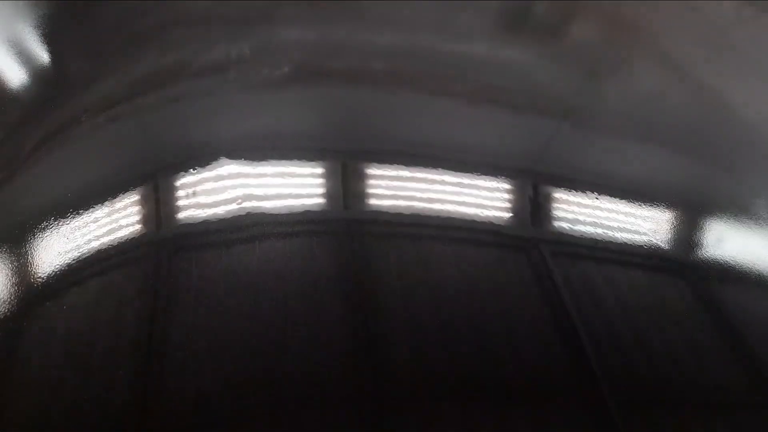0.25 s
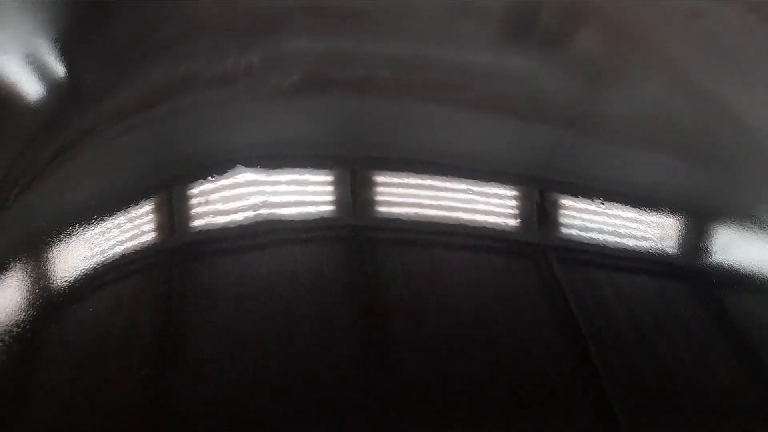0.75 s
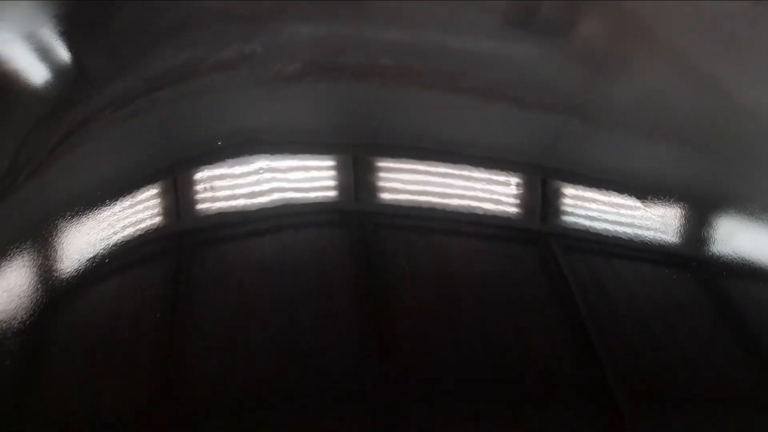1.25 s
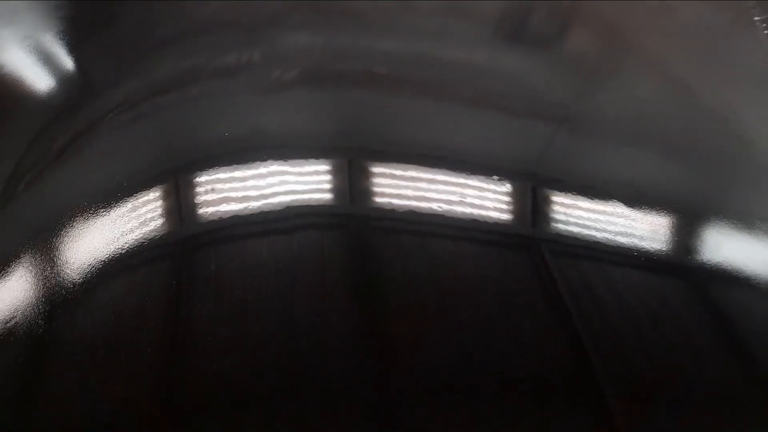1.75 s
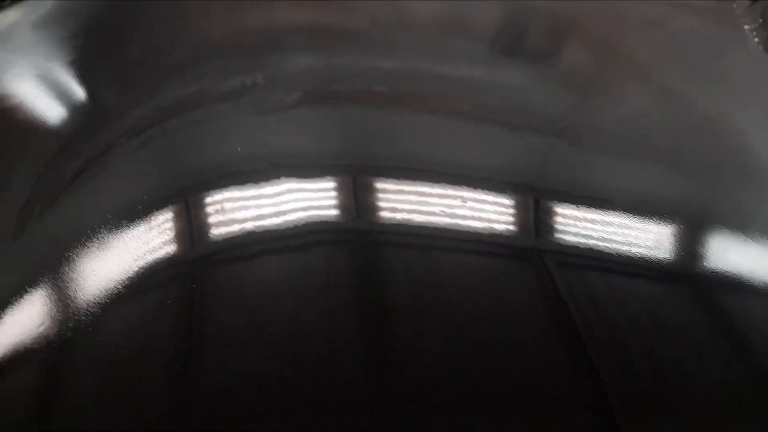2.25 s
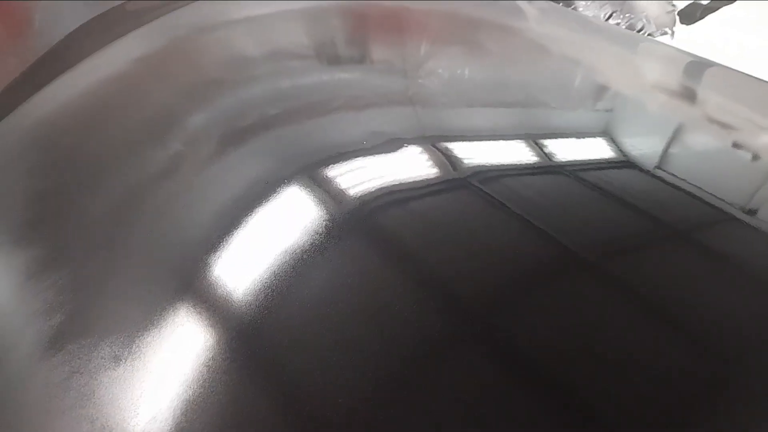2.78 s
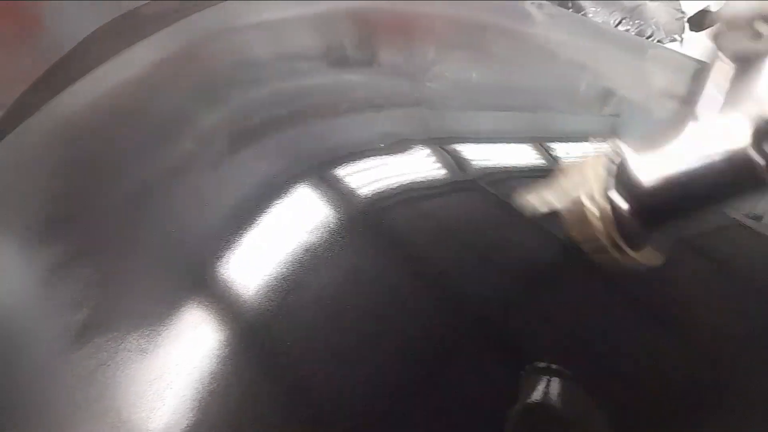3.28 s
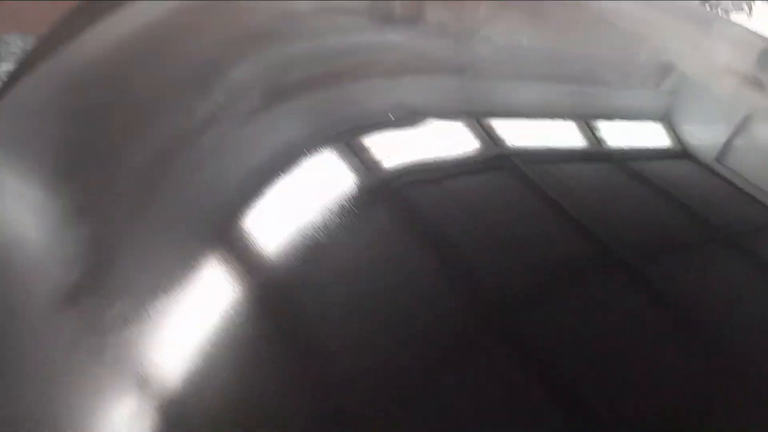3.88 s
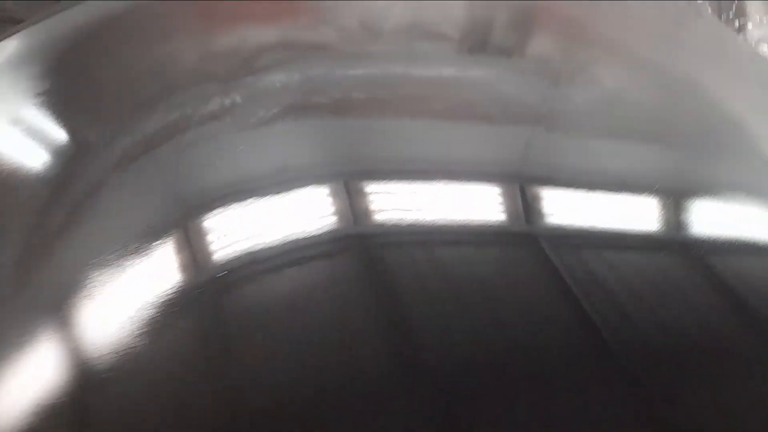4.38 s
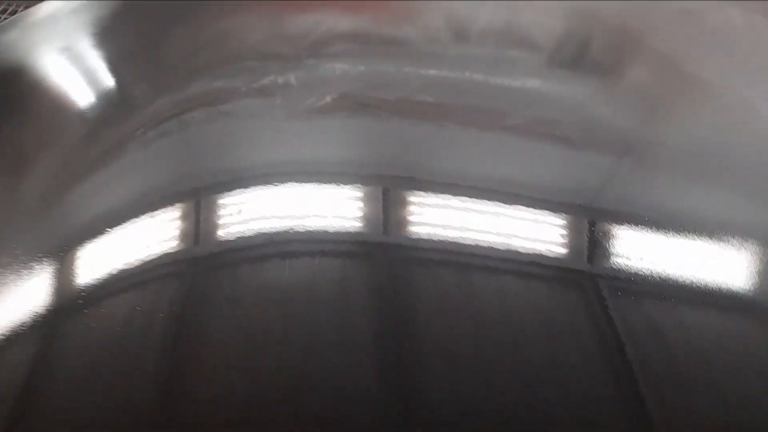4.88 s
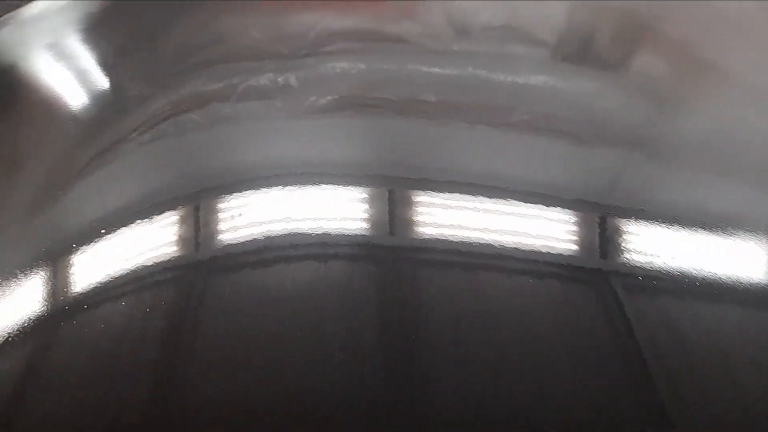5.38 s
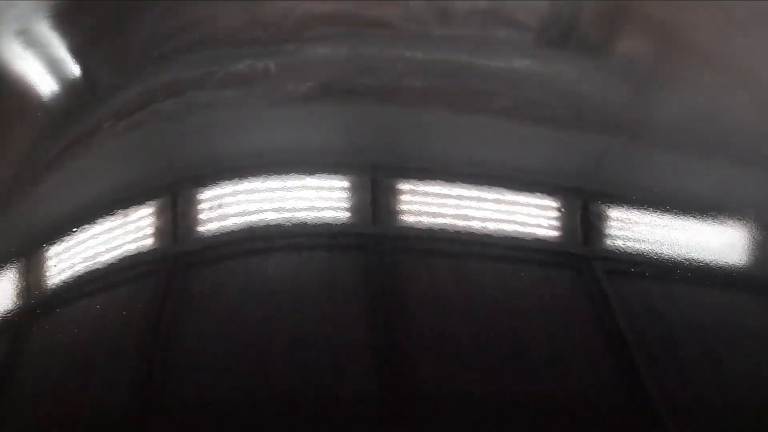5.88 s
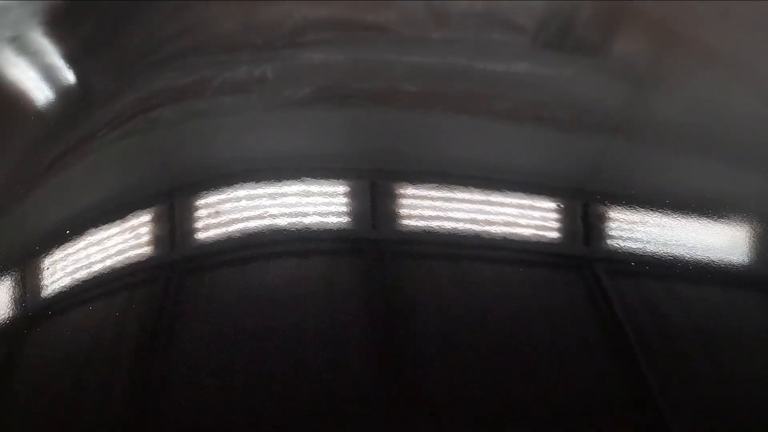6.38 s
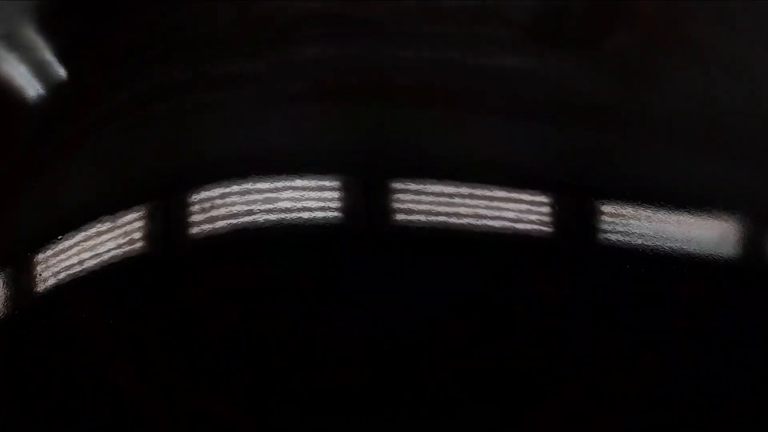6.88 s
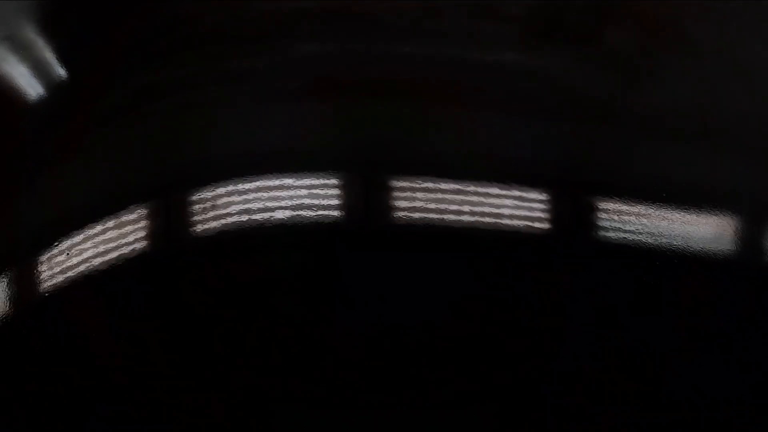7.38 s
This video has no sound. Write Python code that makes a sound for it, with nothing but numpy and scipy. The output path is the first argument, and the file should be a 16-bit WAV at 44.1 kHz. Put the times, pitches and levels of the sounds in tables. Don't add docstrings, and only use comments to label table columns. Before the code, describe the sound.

From 0 to 3 seconds, a spray booth's extraction fans rumble deeply in small irregular surges, with a wavering low hum around 220 hertz, soft filter draught and a barely audible thin air-line hiss. At 2.97 seconds a spray gun cracks open close by and blasts bright, dense compressed air, wide but leaning right; automatic gain at once pushes the fans down. The jet swells and comes nearer the centre around 3.6, then eases slightly as pressure sags. At 4.1 it cuts off abruptly, with a tiny spit at 4.16, a quick hose bleed and a faint dull ring in the booth. The fans stay subdued until 5.06, when a fingertip snaps and thumps on the left microphone. Faint brushes follow near 5.2 and 5.7 as the level recovers by about 5.7. Rumble and hum continue steadily, slightly louder, with faint left-leaning hiss, until 7.6.

```python
import sys
import numpy as np
from scipy import signal
from scipy.fft import rfft, irfft, next_fast_len
from scipy.io import wavfile
from scipy.ndimage import map_coordinates

SR = 44100
rng = np.random.default_rng(int(sys.argv[2]) if len(sys.argv) > 2 else 0)


def amplitude_ratio(level_db):
    exponent = np.asarray(level_db, float) / 20
    return 10 ** exponent


def digitize_waveform(pressure):
    field = np.atleast_2d(pressure).T
    bounded = np.clip(field, -1, 1)
    quanta = np.round(bounded * 32767).astype(np.int16)
    wavfile.write(sys.argv[1], SR, quanta)


N = 336917


def unit(x):
    return x / np.sqrt(np.mean(x ** 2, axis=-1, keepdims=True))


def in_time(rows):
    s, *columns = np.transpose(rows)
    t = np.arange(N) / SR
    return np.array([np.interp(t, s, column) for column in columns])


def on_grid(table):
    size = next_fast_len(N)
    log_hz = np.log(np.arange(size // 2 + 1) * SR / size + 1)
    hz, *columns = np.transpose(table)
    return np.array([np.interp(log_hz, np.log(hz), column) for column in columns])


def drift(rate_hz):
    steps = rng.standard_normal(int(N / SR * 60))
    return np.interp(np.arange(N) / SR * rate_hz, np.arange(len(steps)), steps)


def delayed(x, ms):
    return map_coordinates(x, [np.arange(N) - ms * SR / 1000], order=3, mode="nearest")


def air(spectrum, lag_ms, least_alike=0):
    direct, *diffuse = rng.standard_normal((3, N))
    size = next_fast_len(N)
    *level_db, alike = on_grid(spectrum)
    alike = np.clip(alike, least_alike, 1)
    shared = rfft([delayed(direct, lag_ms), direct], size)
    mixed = np.sqrt(alike) * shared + np.sqrt(1 - alike) * rfft(diffuse, size)
    return irfft(mixed * amplitude_ratio(np.array(level_db)), size)[:, :N]


# hz, width_hz, lift_db
BOOTH_MODES = [(273, 40, 1), (420.5, 28, 6), (513, 70, 5.5), (692, 36, 7), (910, 12, 5), (968, 20, 5.5)]


def booth_modes(x):
    out = x.copy()
    for hz, width_hz, lift_db in BOOTH_MODES:
        b, a = signal.iirpeak(hz, hz / width_hz, fs=SR)
        out += max(amplitude_ratio(lift_db) - 1, 0) * signal.lfilter(b, a, x)
    return out


# start_s (centre), rumble_lift_db, blade_lift_db
SURGES = [(.16, 5, 5), (.48, 4.5, 4.5), (.9, 3.5, 6), (1.28, 1.5, 3.5), (1.8, -0.3, 1), (2.1, 2.5, 3.5),
          (2.4, 2.1, 4), (2.62, 1.1, 2), (2.88, 1.6, 6), (3.36, 2.5, 2), (4.0, 3, 1.5), (4.7, 5.5, 3.5),
          (5.12, 3.5, 2.5), (5.44, 5.5, 4.5), (5.76, 2, 3.5), (5.95, 0, 3.5), (6.1, 2.5, -0.5),
          (6.4, 4.5, 4.5), (6.85, 1.5, 5.5), (7.2, 2.5, 6), (7.52, 3, 4)]
SURGE_WIDTH_S = 0.076
RUMBLE_DB, BLADE_DB, BLADE_SHADED_DB = -26.5, -30, -2
TURNED_S, TURNED_BACK_S = 2.8, 4.7


def surging():
    t = np.arange(0, N, 64) / SR
    s, *lift_db = np.transpose(SURGES)
    swells = np.exp(-.5 * ((t - s[:, None]) / SURGE_WIDTH_S) ** 2)
    rumble_db, blade_db = np.array(lift_db) @ swells
    turn_s = [TURNED_S - .05, TURNED_S, TURNED_BACK_S - .3, TURNED_BACK_S]
    blade_db = blade_db + BLADE_SHADED_DB * np.interp(t, turn_s, [0, 1, 1, 0])
    return in_time(np.transpose([t, RUMBLE_DB + rumble_db, BLADE_DB + blade_db]))


# hz, left_db_per_hz, right_db_per_hz, likeness_0_1
RUMBLE = [(25, 3, -5, 0.95), (39.6, 10, 17, 0.85), (58, 31.5, 28.5, 1), (120.3, 25, 24.5, 0.93),
          (131.4, 10.5, 19, 1), (154, 24, 16, 0.98), (213, 17.5, 19, 0.97), (334, -29.5, -27.5, 0.6)]
# hz, left_db_per_hz, right_db_per_hz, likeness_0_1
DRAUGHT = [(117, 3.5, 6.5, 0.96), (242, 8.5, 4.5, 0.97), (523, -6.5, -7.5, 0.69), (950, -7, -7.5, 0.94),
           (1330, -9.5, -10, 0.53), (2090, -4, -13, 0.13), (2635, -17, -13, 0.057),
           (3750, -25.5, -24.5, .05), (5100, -33.5, -33.5, .05), (6750, -38, -40, .1),
           (12000, -53, -87, .05)]
DRAUGHT_DB, BLADE_HZ = -29, 220.3


def fans(rumble_db, blade_db):
    rumble = air(RUMBLE, lag_ms=-0.055)
    rumble = rumble / rumble.std() * amplitude_ratio(rumble_db + 1.37 * drift(14.0))
    draught = air(DRAUGHT, lag_ms=-0.19)
    draught = booth_modes(draught) / draught.std() * amplitude_ratio(DRAUGHT_DB)
    phase = 2 * np.pi * np.cumsum(BLADE_HZ + .7 * drift(9.0)) / SR
    blade = np.sqrt(2) * np.sin(phase) * amplitude_ratio(blade_db + 1.6 * drift(10.5))
    return rumble + draught + blade * amplitude_ratio(np.array([[-.6], [.6]]))


# hz, left_db_per_hz, right_db_per_hz, likeness_0_1
LEAK = [(6000, -48, -38, .3), (8900, -44.5, -31, 0.26), (10740, -33, -34.5, .4), (11720, -21, -27, 0.39),
        (13100, -22.5, -24, 0.42), (14800, -33, -21, .3), (15700, -32.5, -47, .3)]
# start_s, leak_db, pan_left_minus_right_db, bounce_left_ms, bounce_right_ms
HAND = [(0, -49.5, -3, .15, .2), (.6, -52, -5, 0.14, 0.19), (1.2, -49.5, -3.5, 0.15, .19),
        (1.8, -48, 1, .2, .205), (2.45, -50, 4.5, .21, 0.22), (2.9, -52.5, -1.5, .21, .25),
        (4.2, -50.5, -1.5, 0.23, .19), (4.8, -57, 1, 0.2, .16), (5.5, -57.5, 14, 0.19, .098),
        (6.25, -55, 12, .21, 0.27), (6.55, -55, 15.5, .21, 0.082), (7.64, -54.5, 12, .21, 0.19)]


def leak():
    level_db, pan_db, *bounce_ms = in_time(HAND)
    hiss = air(LEAK, lag_ms=-0.116)
    bounced = [h + .55 * delayed(h, ms) for h, ms in zip(hiss, bounce_ms)]
    return unit(np.array(bounced)) * amplitude_ratio(level_db + pan_db * np.array([[.5], [-.5]]))


# start_s, snap_db, push_db
TAPS = [
    (5.0589, -2, -30),
    (5.0603, -16, -40),
    (5.0621, -12, -5),
    (5.19, -25, -40),
    (5.229, -24, -40),
    (5.707, -27, -40),
]
THUMP_HZ = 120


def taps():
    clicks = np.zeros((2, N))
    for s, *level_db in TAPS:
        clicks[:, round(s * SR)] = amplitude_ratio(np.array(level_db))
    lead = 40
    t = np.arange(-lead, 1300) / SR
    after = np.maximum(t, 0)
    spike = np.where(t <= 0, np.exp(np.minimum(t, 0) / .0001), np.exp(-after / .00004))
    rattle = -.35 * np.sin(2 * np.pi * 4300 * after) * np.exp(-after / .00022)
    push = -1.1 * np.sin(2 * np.pi * THUMP_HZ * after) * np.exp(-after / 0.0071)
    left = signal.fftconvolve(clicks, [spike + rattle, push], axes=1).sum(axis=0)[lead:N + lead]
    return left * amplitude_ratio(np.array([[0], [-27]]))


PULL_S, RELEASE_S, SPIT_S = 2.9738, 4.115, 4.1605
CRACK_S, CRACK_DB, FILL_S = .0014, -7, .01
JET_DB, NEAR_DB_PER_MS = [[-17.5], [-15.5]], [[10.5], [5]]
SAG_FROM_S, SAG_DB_PER_S = 3.72, [[6], [5]]
SHUT_DB_PER_S, BLEED_DB, BLEED_DB_PER_S = 600, -34, 42
SPIT_DB, SPIT_RISE_DB_PER_S, SPIT_FALL_DB_PER_S = -14, 1500, 420


def trigger(lag_ms):
    t = np.arange(N) / SR
    opening = np.interp(t - PULL_S, [0, CRACK_S, CRACK_S + FILL_S], [-38, CRACK_DB, 0])
    sag = np.clip(t - SAG_FROM_S, 0, RELEASE_S - SAG_FROM_S) * np.array(SAG_DB_PER_S)
    hold = JET_DB + (lag_ms.max() - lag_ms) * NEAR_DB_PER_MS - sag
    since = np.maximum(t - RELEASE_S + 0.013, 0)
    spit_rise = (SPIT_S - t) * SPIT_RISE_DB_PER_S
    spit_fall = (t - SPIT_S) * SPIT_FALL_DB_PER_S
    spit = SPIT_DB - np.maximum(spit_rise, spit_fall)
    shut = -SHUT_DB_PER_S * since
    bleed = BLEED_DB - BLEED_DB_PER_S * since
    closing = np.max([shut, spit, bleed], axis=0)
    return amplitude_ratio(hold + opening + closing) * (t > PULL_S)


# hz, left_db_per_hz, right_db_per_hz, likeness_0_1
JET = [(700, -35, -16, 1), (1340, -10, -11.5, 0.83), (2100, -8, -4.5, 0.92), (3090, -14.5, -9.5, 0.87),
       (3230, -14.5, -4.5, 0.33), (3940, -6.5, -3.5, 0.52), (4770, -10.5, -4, 0.33), (6700, 0, -2.5, .5),
       (9100, -1, -0.5, 0.46), (10000, -9, -4, .55), (11000, -6.5, 2, 0.26), (14100, -8.5, 1, .5),
       (16700, -10.5, -2, 0.36)]
# start_s, left_lag_ms
BLAST_LAG = [
    (2.97, .525),
    (3.22, .515),
    (3.34, .46),
    (3.45, .4),
    (3.62, .29),
    (3.8, .32),
    (3.9, .4),
    (4.02, .5),
    (4.2, .52),
]
TAIL_DB, TAIL_CUT_HZ, TAIL_T60_S = -45.5, 6400, 5.5


def spray_gun():
    lag_ms = in_time(BLAST_LAG)[0]
    jet = air(JET, lag_ms, least_alike=.52)
    bounced = [j + 0.11 * delayed(j, 0.377 + 0.074 * drift(3.4)) for j in jet]
    jet = unit(np.array(bounced))
    direct = jet * trigger(lag_ms) * amplitude_ratio(.4 * drift(25.0))
    lowpass = signal.butter(6, TAIL_CUT_HZ, fs=SR, output="sos")
    dull = signal.sosfilt(lowpass, jet[:, ::-1])
    since = np.arange(N) / SR - RELEASE_S
    ring_db = TAIL_DB - 60 * np.maximum(since, 0) / TAIL_T60_S
    return direct + dull * amplitude_ratio(ring_db) * (since > 0)


def scene():
    return fans(*surging()) + leak() + taps() + spray_gun()


DUCK_S, DUCK_ATTACK_S, DUCK_DB = 2.972, 0.012, -8
LET_GO_S, RECOVER_S, CREEP_DB_PER_S = 5.076, 0.59, 0.0785


def gain_control():
    t = np.arange(N) / SR
    attack = np.clip((t - DUCK_S) / DUCK_ATTACK_S, 0, 1)
    recovery = np.clip((t - LET_GO_S) / RECOVER_S, 0, 1) ** 0.97
    return amplitude_ratio(DUCK_DB * attack * (1 - recovery) + CREEP_DB_PER_S * t)


# hz, left_db, right_db
PORTS = [(16, -30, -34), (40, 0, 0), (6600, 0, 0), (7400, -9, -1), (8150, -24, -7), (9000, -11, -2),
         (10500, 0, 0), (15550, 0, 0), (15800, -70, -70)]


def port_colour(dry):
    size = next_fast_len(N)
    bridge = np.linspace(dry[:, -1], dry[:, 0], size - N, axis=1)
    return irfft(rfft(np.hstack([dry, bridge])) * amplitude_ratio(on_grid(PORTS)), size)[:, :N]


def roll_off(x):
    return signal.sosfilt(signal.butter(12, 16810, fs=SR, output="sos"), x)


def record(dry):
    mix = port_colour(dry) * gain_control()
    return roll_off(mix)


dry = scene()
out = record(dry)
digitize_waveform(out)
```